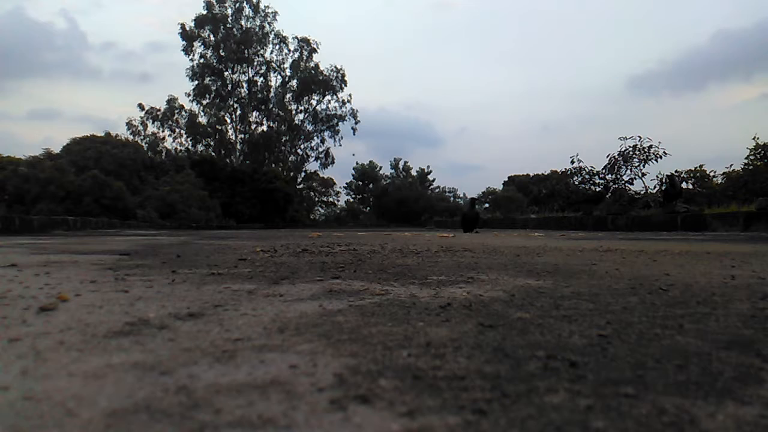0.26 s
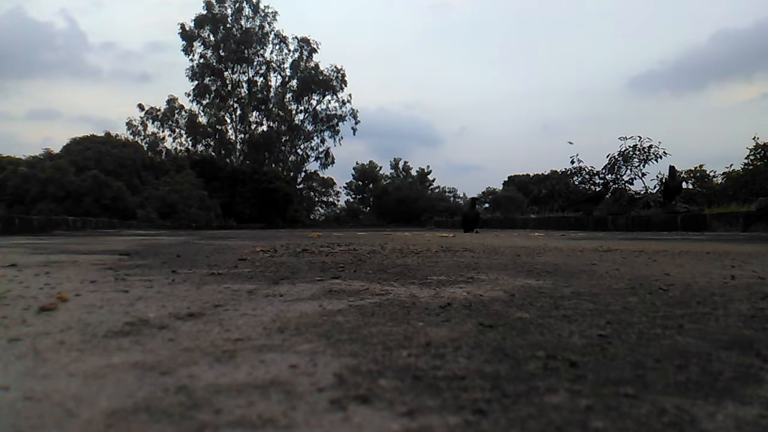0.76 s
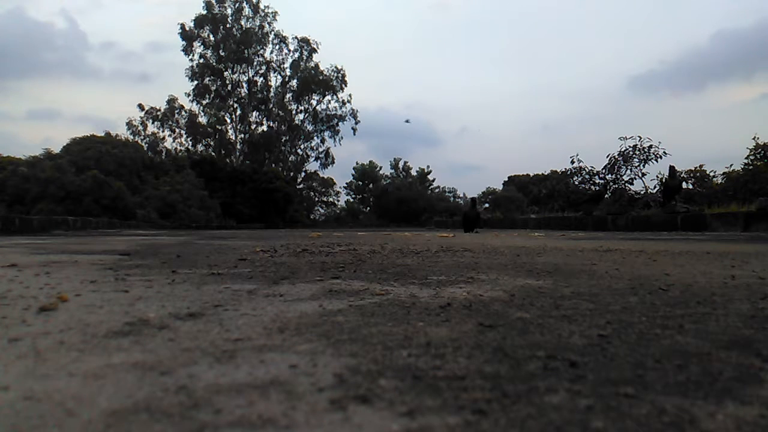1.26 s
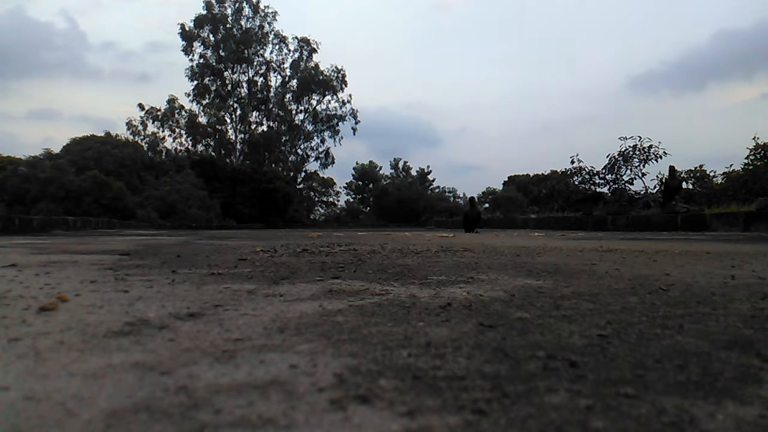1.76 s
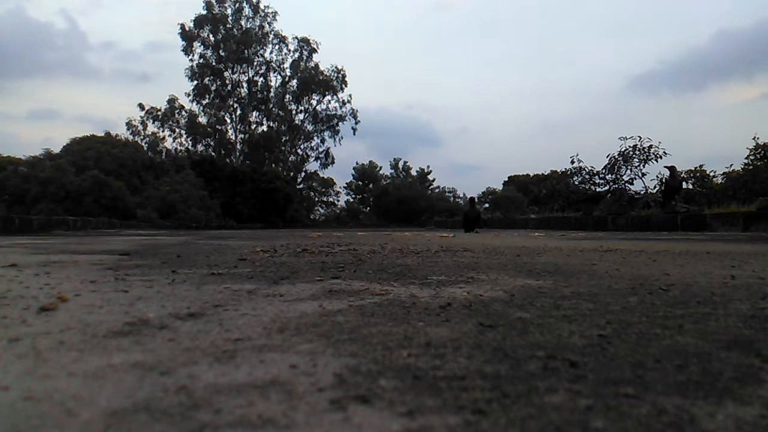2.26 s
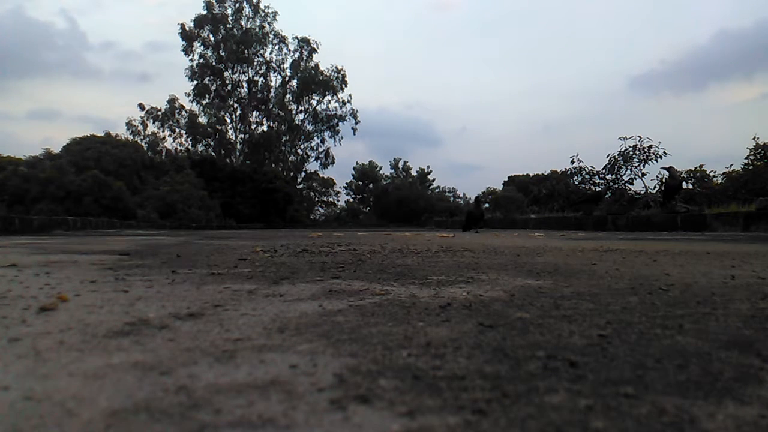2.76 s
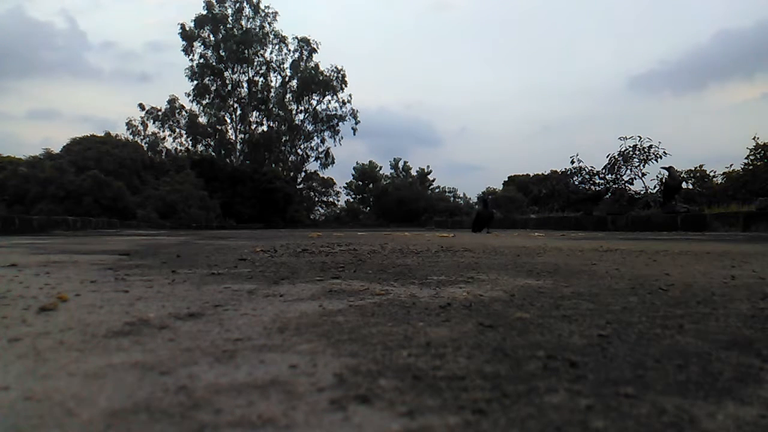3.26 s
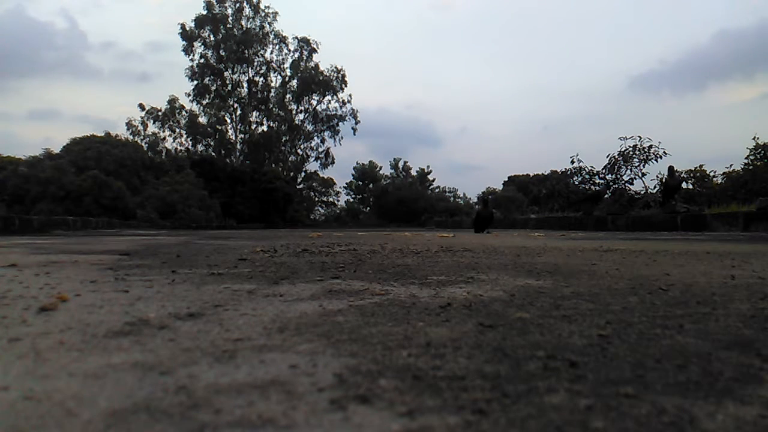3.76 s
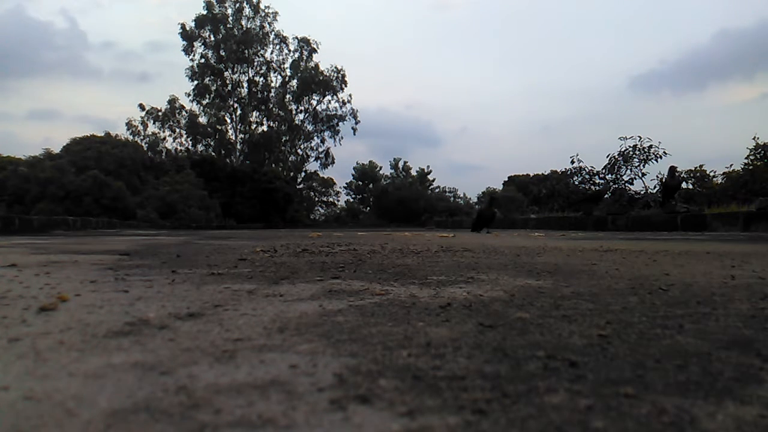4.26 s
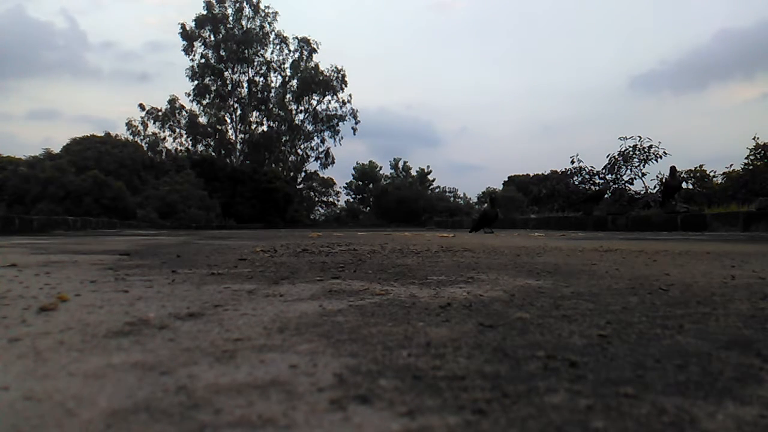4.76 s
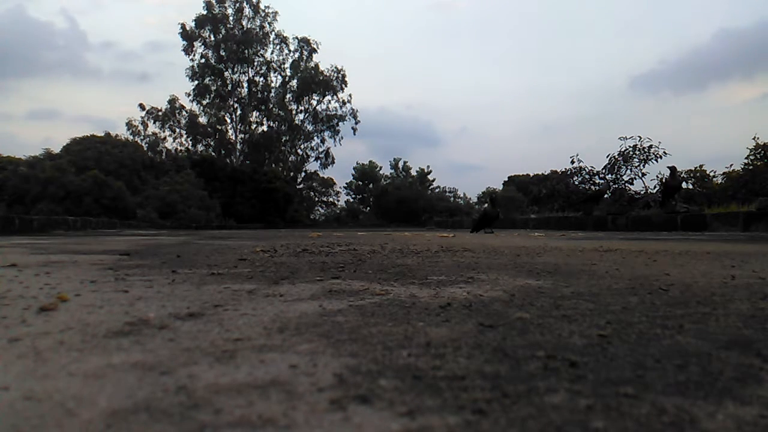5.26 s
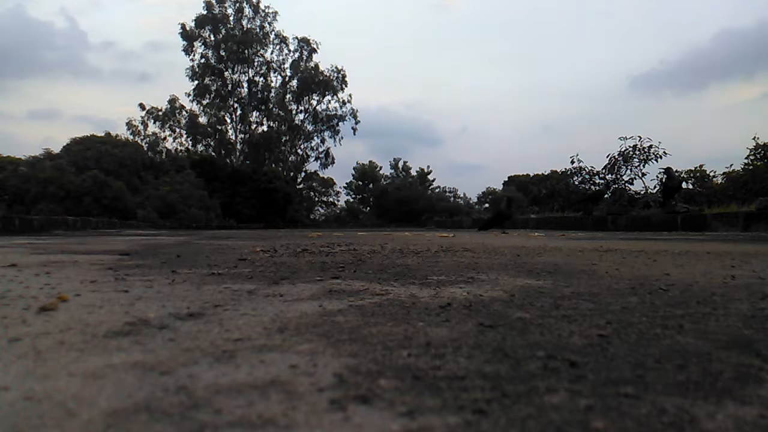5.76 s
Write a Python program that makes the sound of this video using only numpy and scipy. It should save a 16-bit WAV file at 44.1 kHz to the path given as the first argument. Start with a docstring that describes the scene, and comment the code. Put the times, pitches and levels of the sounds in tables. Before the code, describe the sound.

Harsh, short crow caws sound close by outdoors, three in a row with a slight echo from the trees. A pause of about two seconds leaves faint chirps, a repeated rising bird note and low wind buffeting the microphone. Four more caws follow, distant and near by turns, as a soft gust rises and falls. A faint low throb and thin hiss lie underneath.

```python
"""Crows in a tree-ringed yard

Crows caw across an open yard, some close to the microphone, some further off among the trees.
A caw is a buzz near 480 Hz whose pitch flutters about 75 times a second, sweeping its harmonics
through the throat. Small birds whistle behind them and one dry tick sounds on the ground.
A light breeze buffets the microphone over a faint low throb, far-off notes and a thin hiss of air."""
import sys
import numpy as np
from scipy import signal
from scipy.fft import rfft, irfft
from scipy.io import wavfile
from scipy.ndimage import uniform_filter1d

SR = 44100
rng = np.random.default_rng(int(sys.argv[2]) if len(sys.argv) > 2 else 0)


def output_pcm(signal):
    """Save a mono or channel-first signal as 16-bit PCM at the path in sys.argv[1].

    Samples are clipped to [-1, 1] before scaling.
    """
    pcm = np.clip(np.atleast_2d(signal).T, -1, 1) * 32767
    wavfile.write(sys.argv[1], SR, np.round(pcm).astype(np.int16))


N = 265041
TIME = np.arange(N) / SR

# Caws as they reach the microphone: (start [s], end [s], crest [share of length], arch height [ratio],
# level [dB], sag by the end [dB], top pitch [Hz], top flutter [Hz], flutter depth [share of pitch],
# throat size [ratio], body [dB], edge [dB], treble [dB], beak ring [Hz], beak ring [dB],
# high ring [Hz], high ring [dB])
CROW_CAWS = [(-.25, 0.072, 0.48, 1.17, -18.5, 1, 499.6, 79, 0.092, 0.95, 2.5, -3, -2, 4460, 13, 7400, 8),
             (-.1, 0.236, 0.43, 1.1, -37.5, 9, 526.5, 76.5, 0.16, .91, 0.5, 0.5, -11, 4840, 6, 7600, 2),
             (0.458, 0.769, 0.52, 0.98, -17, 1, 501.9, 77.7, 0.089, 1.0095, 0.5, 1.5, -4, 4350, 14, 7200, 8),
             (1.119, 1.426, 0.54, 0.98, -17, 0.5, 492.4, 77.96, 0.086, 1.02, -0.5, 3, -4.5, 4360, 14.5, 7200, 10),
             (1.828, 2.164, 0.35, 1.58, -51.5, 5, 511, 76.2, 0.085, 0.94, 9, 10, -8.5, 4500, -8, 7470, -6),
             (3.686, 4.066, .38, 2.3, -33.5, 11.5, 460, 71.6, 0.099, 0.94, -1.5, 6, -16, 5040, 25, 7900, -1),
             (4.54, 4.828, .43, 1, -20, 1.5, 449, 76.87, .1, 1, 1.5, 6, -10, 4770, 8, 8750, 16),
             (5.299, 5.769, 0.42, 1.2, -36.5, 2.5, 453.4, 79, 0.098, 0.99, 3.5, 16, -10, 4820, 13, 7100, 4),
             (5.678, 6.035, 0.55, 0.78, -21, 2, 502.5, 83.26, 0.15, 1.04, -.5, 2.5, -11, 4640, 22, 7860, 12.5)]


def crows(nearest_db=-17, scatter_per_db=0.69):
    """The fainter a caw, the further off the bird, and the more of it arrives by way of the trees."""
    direct, scattered = 0, 0
    for start, end, crest, height, level_db, *voice_settings in CROW_CAWS:
        voice = ground(caw(start, end, crest, height, level_db, *voice_settings))
        distance_db = min(nearest_db - level_db, 15)
        direct += voice
        scattered += voice * undb(scatter_per_db * distance_db)
    early = yard(scattered, wet_db=-12.5, t60=0.37, delay_s=0.003) - scattered
    late = yard(direct, wet_db=-24.5, t60=0.85) - direct
    return direct + early + late


def caw(start, end, crest, height, level_db, sag_db, top_hz, flutter_hz, depth, *timbre):
    """Fluttering pulses through the throat: ragged at first, clean on top, ending in a falling groan."""
    on = (TIME >= start - 0.005) & (TIME < end + 0.02)
    t = TIME[on]
    age = (t - start) / (end - start)
    pitch, swing, rough = arch(age, crest, height)
    effort_db = effort(age, crest, sag_db)
    # the flutter slows as the pitch sinks; each cycle flicks up and slides down
    flutter = phase_of(flutter_hz * pitch ** 0.7 * (1 + 0.12 * rough * wander(150, len(t))))
    sweep = np.sin(flutter) + 0.22 * np.sin(2 * flutter)
    jitter = (0.003 + 0.06 * rough) * wander(700, len(t))
    phase = phase_of(top_hz * pitch * (1 + depth * swing * sweep + jitter))
    source = membranes(phase, rough) * (1 + 0.32 * swing * np.sin(flutter))
    voice = slacken(throat(source, *timbre), pitch, effort_db)
    voice /= np.sqrt(np.abs(uniform_filter1d(voice ** 2, size=1200)) + 1e-9)  # even out the level
    _, _, collapse = stages(age, crest)
    voice += groan(phase, collapse)
    fade_in = np.clip((t - start) / 0.005 + 1, 0, 1)
    out = np.zeros(N)
    out[on] = voice * fade_in * undb(level_db + effort_db)
    return out


def stages(age, crest, release_share=0.19):
    """How far a caw is before its crest, past it and into its collapse; age runs 0-1 over the caw."""
    rise = np.clip(1 - age / crest, 0, 1)
    fall = np.clip((age - crest) / (1 - crest), 0, 1)
    collapse = np.maximum(1 + (age - 1) / release_share, 0)
    return rise, fall, collapse


def arch(age, crest, height, scoop=0.27, droop=0.19, drop=0.54, still_share=0.87):
    """Pitch ratio, flutter swing, roughness: a caw tightens and clears, then sinks and stops fluttering."""
    rise, fall, collapse = stages(age, crest)
    pitch = 1 - height * (scoop * rise ** 2.5 + droop * fall ** 2)
    pitch *= 1 - drop * np.minimum(collapse, 1) ** 2
    swing = (1 - 0.38 * rise ** 6) / (1 + np.exp((age - still_share) / 0.03))
    rough = 0.11 + 0.79 * rise ** 1.9 + 0.22 * fall ** 2
    return np.maximum(pitch, 0.1), swing, rough


def effort(age, crest, sag_db, attack_share=0.31, ends_db=-27.5):
    """Relative level of a caw in dB: it swells, holds, tires after the crest and collapses."""
    _, fall, collapse = stages(age, crest)
    onset = np.maximum(1 - age / attack_share, 0)
    return ends_db * onset ** 2 - sag_db * fall + ends_db * collapse ** 2


def membranes(phase, rough, fundamental_db=-13, hiss_db=-5, rasp_db=-8):
    """The crow's membranes buzz and rasp, and air hisses through each time they open."""
    count = len(phase)
    overtones = sum(np.cos(k * phase) for k in range(2, 34))
    buzz = unit(undb(fundamental_db) * np.cos(phase) + overtones)
    puffs = rng.standard_normal(count) * (1 + 0.8 * np.cos(phase))
    hiss = undb(hiss_db) * colour(puffs, [(2200, -20), (3200, -4), (9000, 0)])
    rasp = undb(rasp_db) * rough * rng.standard_normal(count)
    shimmer = undb((0.6 + 3 * rough) * wander(250, count))
    return (buzz + hiss + rasp) * shimmer


# Resonances of a crow's throat and beak: (frequency [Hz], gain [dB])
THROAT_RESPONSE = [(250, -42), (520, -19.5), (750, -10), (980, -8), (1200, -7), (1480, 2.5), (1680, -1),
                   (1860, 11), (2100, -7), (2350, -10.5), (2550, -23.5), (3300, -26), (6200, -39),
                   (10000, -45), (14000, -57.5)]


def throat(source, size, body_db, edge_db, treble_db, beak_hz, beak_db, high_hz, high_db, edge_hz=2350):
    """Each bird has its own body; one facing away from the microphone loses its treble."""
    response = [(hz, db + np.interp(hz, [1480, 1860, 2300, 3300], [body_db, 0, 0, treble_db]))
                for hz, db in THROAT_RESPONSE]
    voice = colour(source, response, size, [(beak_hz, beak_db), (high_hz, high_db)], ring_width_hz=490)
    return colour(voice, [(1000, 0)], rings=[(edge_hz, edge_db)], ring_width_hz=210)


def slacken(voice, pitch, effort_db, cutoff_hz=2100):
    """A slack or weak voice is duller."""
    tension = np.clip(1 - 2.1 * (1 - pitch), 0.1, 1) * undb(0.37 * effort_db)
    dull = signal.sosfiltfilt(signal.butter(4, cutoff_hz, fs=SR, output="sos"), voice)
    return tension * voice + (1 - tension) * dull


def groan(phase, collapse, db=-8.5):
    """As the voice sinks at the end, its second harmonic comes through nearly pure."""
    return undb(db) * np.sqrt(2) * np.sin(2 * phase) * np.clip(2 * (collapse - 0.1), 0, 1)


def small_birds():
    """Small birds back in the trees; moving air and leaves make their whistles waver in level."""
    whistles = (slurs() + song()) * undb(5.7 * wander(90, N))
    return yard(whistles + churr(), wet_db=-5, t60=0.7)


# Slurs from the trees: (start [s], length [s], first pitch [Hz], last pitch [Hz], level [dB])
BIRD_SLURS = [(0.132, 0.09, 2200, 2530, -52), (.3, 0.03, 3184, 2890, -64.5),
              (0.383, 0.063, 3740, 2700, -64.5), (0.821, 0.12, 4350, 3120, -72.5),
              (1.434, 0.11, 3730, 3750, -66.5), (1.786, 0.061, 2450, 2065, -66.5),
              (2.045, 0.11, 5050, 4180, -79.5), (2.403, 0.064, 3500, 2670, -74.5),
              (3.495, .078, 2360, 2385, -70), (3.548, .045, 3000, 3730, -78.5),
              (4.09, 0.057, 4400, 3460, -68), (4.068, 0.06, 3270, 2430, -71),
              (4.227, 0.096, 4600, 3600, -73), (5.005, 0.026, 2910, 2800, -62),
              (5.319, .07, 4550, 4070, -74), (5.523, 0.11, 4600, 3060, -71.5)]


def slurs(bow=0.12):
    """Short whistled glides, each bowed upward in the middle by a share of its span."""
    out = np.zeros(N)
    for start, length, first_hz, last_hz, db in BIRD_SLURS:
        middle_hz = (first_hz + last_hz) / 2 + bow * abs(last_hz - first_hz)
        glide = [(0, first_hz, db), (length / 2, middle_hz, db), (length, last_hz, db)]
        out += whistle(start, glide, waver=0.02)
    return out


# One bird's rising note: (time into the note [s], pitch [Hz], relative level [dB])
SONG_NOTE = [(0, 2355, -9.5), (.025, 2450, -24), (.075, 2886, -18), (0.102, 3527, -13.5), (.118, 3616, -14),
             (0.145, 3710, -37)]


def song(start_s=1.525, period_s=0.3345, repeats=6, gain_db=-51):
    """One bird repeats its note at an even pace, blurred by the leaves round it."""
    notes = sum(whistle(start_s + k * period_s, SONG_NOTE, waver=0.0285) for k in range(repeats))
    return yard(undb(gain_db) * notes, wet_db=1.5, t60=0.16, delay_s=0.0066)


# A small bird's churr: (frequency [Hz], relative level [dB])
CHURR_SPECTRUM = [(1500, -28), (2600, -5), (3200, -2.5), (4200, -5.5), (5200, -23.5), (9000, -55.5)]


def churr(middle_s=5.15, half_width_s=0.087, pulse_hz=72, db=-66.5):
    """A dry, quickly pulsing noise that swells and fades once."""
    swell = np.exp(-((TIME - middle_s) / half_width_s) ** 2)
    pulses = 1 + 0.58 * np.sin(2 * np.pi * pulse_hz * TIME)
    return undb(db) * noise(CHURR_SPECTRUM) * swell * pulses


# A dry tick on the ground: (frequency [Hz], relative level [dB])
TICK_SPECTRUM = [(1200, 5), (2400, 3), (3400, -7.5), (4500, 4.5), (5800, -13), (7200, -7), (9000, -15),
                 (14000, -33)]


def tick(at_s=4.423, decay_s=0.019, db=-43):
    """A hard little knock on the ground, carrying round the yard."""
    age = TIME - at_s
    knock = undb(db) * noise(TICK_SPECTRUM) * (age > 0) * np.exp(-np.abs(age) / decay_s)
    return yard(knock, wet_db=-12, t60=1.0)


# Strength of the breeze at the microphone: (time [s], level [dB])
EDDY_LEVELS = [(0.0, -44.5), (0.45, -42), (0.9, -57), (0.95, -40.5), (0.99, -42.5), (1.89, -43.5),
               (1.96, -39), (2.69, -44), (4.45, -33), (5.39, -38), (5.88, -48), (6.01, -31)]
# Rumble of its eddies: (frequency [Hz], relative level [dB])
EDDY_SPECTRUM = [(20, -31.5), (40, -15), (65, 0), (130, 4), (175, -1.5), (230, -19), (500, -49.5),
                 (1000, -56.5), (3000, -110)]


def eddies(calm_size=1.152, gust_size=0.96, gain_db=-1):
    """Eddies shake the microphone: large and deep in the calm, smaller in the gust."""
    strength = gust() / gust().max()
    large, small = noise(EDDY_SPECTRUM, calm_size), noise(EDDY_SPECTRUM, gust_size)
    rumble = np.sqrt(1 - strength) * large + np.sqrt(strength) * small
    level_db, = curves(EDDY_LEVELS, TIME)
    return rumble * undb(level_db + gain_db + 1.8 * wander(30, N))


# Single buffets right on the microphone: (time [s], peak level [dB])
MICROPHONE_BUFFETS = [(0.948, -34.5), (1.358, -37.5), (2.95, -42), (3.112, -31.5), (4.745, -31.5)]


def buffets(width_s=0.0021):
    """Each buffet pushes and pulls on the microphone once."""
    out = np.zeros(N)
    for at_s, db in MICROPHONE_BUFFETS:
        lead = (at_s - TIME) / width_s
        out += undb(db) * lead * np.exp((1 - lead ** 2) / 2)
    return out


# Rush of the breeze in the yard: (frequency [Hz], relative level [dB])
RUSH_SPECTRUM = [(120, -28), (260, 1), (430, -1.5), (600, -20), (1000, -25), (2000, -30), (5000, -56.5),
                 (14000, -60.5)]


def rush():
    """A soft rush of wind that rises with the gust."""
    return noise(RUSH_SPECTRUM) * gust() * undb(2 * wander(40, N))


def gust(peak_s=4.704, peak_db=-43, calm_db=-63.5, rise_db_per_s=7.5, fall_db_per_s=28):
    """Gain of one long gust: a slow build and a quicker fall, above the calm."""
    since = TIME - peak_s
    swell_db = peak_db + np.minimum(rise_db_per_s * since, -fall_db_per_s * since)
    return np.hypot(undb(calm_db), undb(swell_db))


def throb(rate_hz=24.5, db=-48):
    """A faint train of soft low thuds that swells and fades."""
    beats = np.diff(np.floor(TIME * rate_hz), prepend=0) * undb(3.5 * wander(12, N))
    thud = [(30, -31.5), (80, -9.5), (122, -2.5), (170, -8.5), (260, -20), (700, -60.5), (3000, -110)]
    return undb(db) * unit(colour(beats, thud))


# Faint low notes from far off: (start [s], pitch [Hz], level [dB])
DISTANT_NOTES = [(.3, 589.6, -51.5), (.78, 650, -61), (.86, 589.4, -55), (1.259, 519, -55),
                 (1.421, 521, -55.5), (1.61, 705, -58), (1.62, 456, -62.5), (1.831, 551, -63),
                 (1.98, 582, -60), (2.19, 625, -56)]


def far_notes(length_s=0.08, fall=0.93):
    """Short, wavering, slightly falling tones from a distance."""
    notes = sum(whistle(start, [(0, hz, db), (length_s, hz * fall, db)], waver=0.21)
                for start, hz, db in DISTANT_NOTES)
    return yard(notes, wet_db=-10, t60=0.4)


# Open air of the yard: (frequency [Hz], relative level [dB])
AIR_SPECTRUM = [(200, -19.5), (550, 2.5), (1000, -8), (2000, -10), (3600, -14), (4600, -23.5), (6500, -26),
                (7800, -22), (8400, -18.5), (9200, -24.5), (14000, -25.5)]


def air(db=-64.5):
    """A faint, nearly steady hiss behind everything."""
    return noise(AIR_SPECTRUM) * undb(db + 0.33 * wander(25, N))


def ground(x, db=-3, t60=0.012, size=512):
    """Gritty ground between bird and microphone scatters the treble within a few milliseconds."""
    grit = rng.standard_normal(size) * undb(-60 * TIME[:size] / t60)
    highpass = signal.butter(6, 2800, "high", fs=SR, output="sos")
    grit = signal.sosfilt(highpass, grit / np.linalg.norm(grit))
    return x + undb(db) * signal.fftconvolve(x, grit)[:N]


def yard(x, wet_db, t60, delay_s=0.0057):
    """Adds scatter from the trees and walls, hollow in the middle range, dying away in t60 seconds."""
    t = TIME[:SR]
    envelope = undb(-60 * t / t60) * np.clip(t / delay_s, 0, 1)
    scatter = rng.standard_normal(SR) * undb(wander(49, SR)) * envelope
    tone = [(500, 11), (1000, -3), (2000, -8), (5000, 1.5), (12000, 15)]
    scatter = colour(scatter / np.linalg.norm(scatter), tone)
    return x + undb(wet_db) * signal.fftconvolve(x, scatter)[:N]


def whistle(start, note, waver):
    """A tone of wavering pitch along (time [s], pitch [Hz], level [dB]) points."""
    on = (TIME >= start) & (TIME < start + note[-1][0])
    hz, db = curves(note, TIME[on] - start)
    phase = phase_of(hz * (1 + waver * wander(400, len(hz))))
    out = np.zeros(N)
    out[on] = np.sqrt(2) * np.sin(phase) * undb(db) * signal.windows.tukey(len(hz), 0.4)
    return out


def colour(x, points, ratio=1, rings=(), ring_width_hz=380, size=4096):
    """Causal filter through (frequency [Hz], gain [dB]) points, lowered by a ratio, plus ring peaks."""
    hz = np.maximum(np.arange(size // 2 + 1) * SR / size, 1)
    knots, db = np.transpose(points)
    db = np.interp(np.log(hz * ratio), np.log(knots), db)
    for ring_hz, ring_db in rings:
        db += ring_db / (1 + ((hz - ring_hz) / ring_width_hz) ** 2)
    # folding the cepstrum gives minimum phase
    cepstrum = irfft(np.log(undb(db)))
    cepstrum[1:size // 2] *= 2
    cepstrum[size // 2 + 1:] = 0
    return signal.fftconvolve(x, irfft(np.exp(rfft(cepstrum))))[:len(x)]


def noise(points, ratio=1):
    """Coloured noise of rms 1; a larger ratio is deeper."""
    return unit(colour(rng.standard_normal(N), points, ratio))


def wander(rate_hz, count):
    """Smooth random motion of spread 1."""
    hold = max(int(SR / rate_hz), 1)
    steps = np.repeat(rng.standard_normal(count // hold + 1), hold)
    return unit(uniform_filter1d(steps, hold)[:count])


def curves(rows, at):
    """Each later column of a table against the first, joined by straight lines."""
    knots, *columns = np.transpose(rows)
    return [np.interp(at, knots, column) for column in columns]


def phase_of(hz):
    """Running phase in radians."""
    return 2 * np.pi * np.cumsum(hz) / SR


def undb(db):
    """Decibels to gain."""
    return 10 ** (np.asarray(db) / 20)


def unit(x):
    """Scale to rms 1."""
    return x / np.sqrt(np.mean(x ** 2) + 1e-18)


def scene():
    """One microphone in the yard: crows in front, small birds in the trees, wind close up."""
    foreground = crows() + small_birds() + tick()
    breeze = eddies() + buffets() + rush()
    background = throb() + far_notes() + air()
    return (foreground + breeze + background)[None]


def record(dry):
    """The camera's microphone cuts the top above 14.3 kHz."""
    return signal.sosfilt(signal.ellip(10, 0.2, 70, 14300, fs=SR, output="sos"), dry)


dry = scene()
out = record(dry)
output_pcm(out)
```